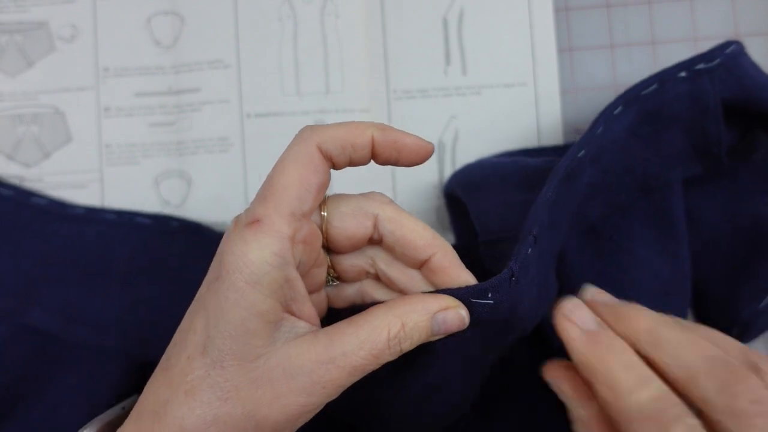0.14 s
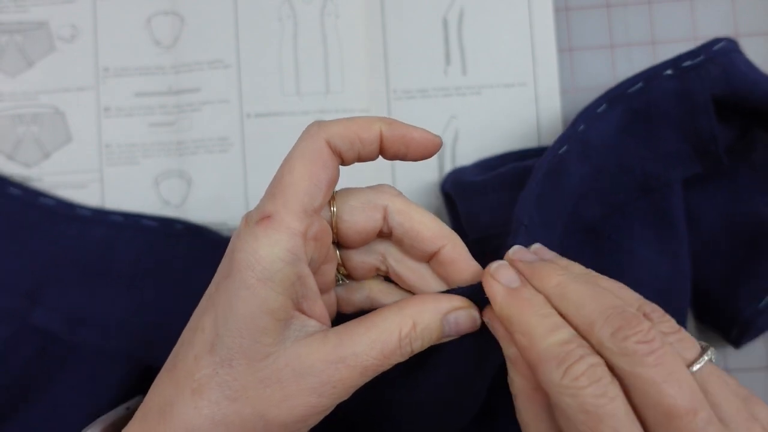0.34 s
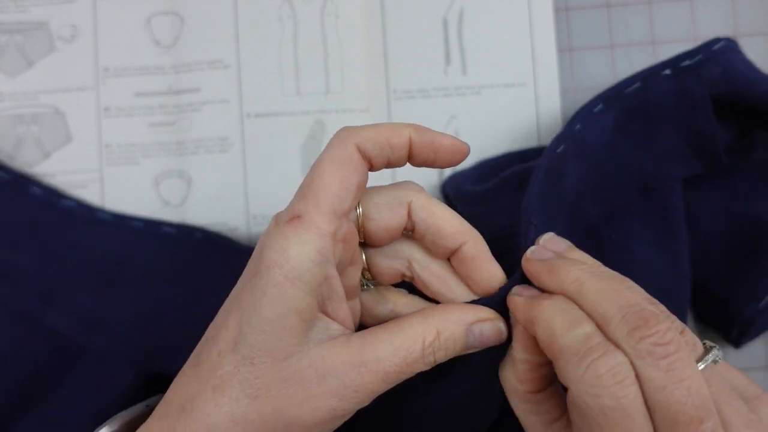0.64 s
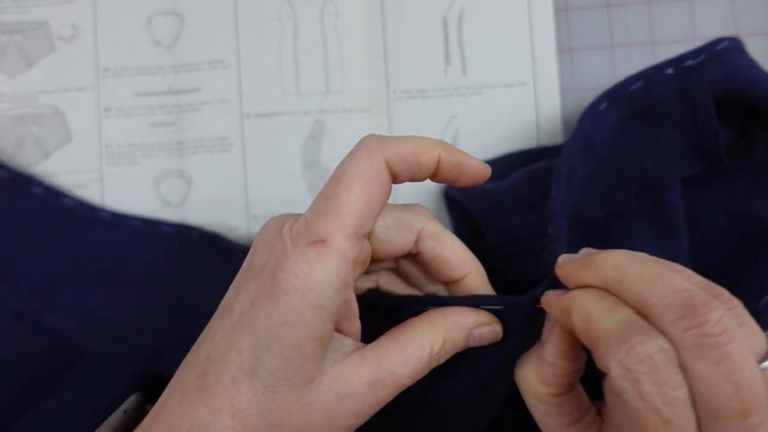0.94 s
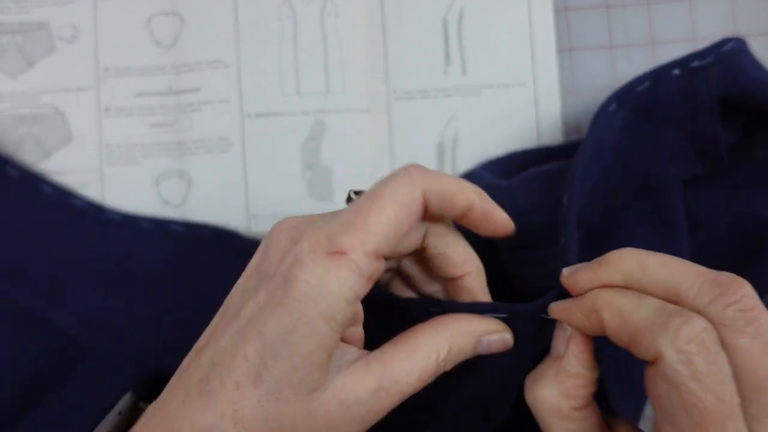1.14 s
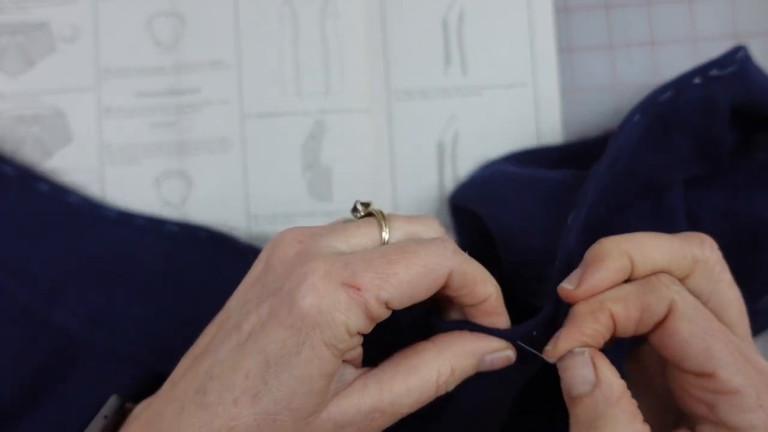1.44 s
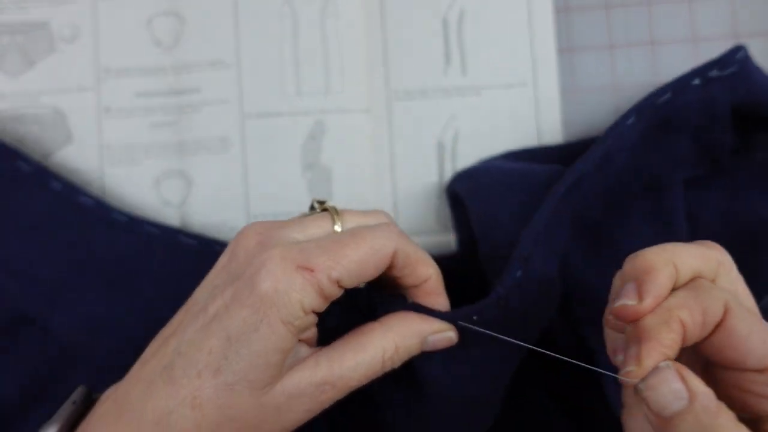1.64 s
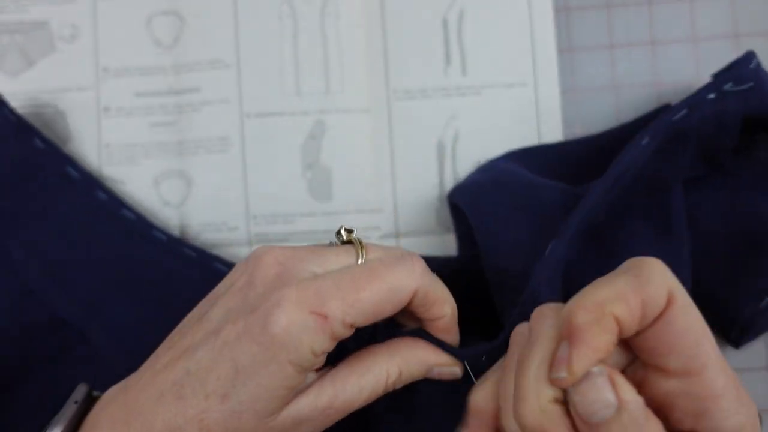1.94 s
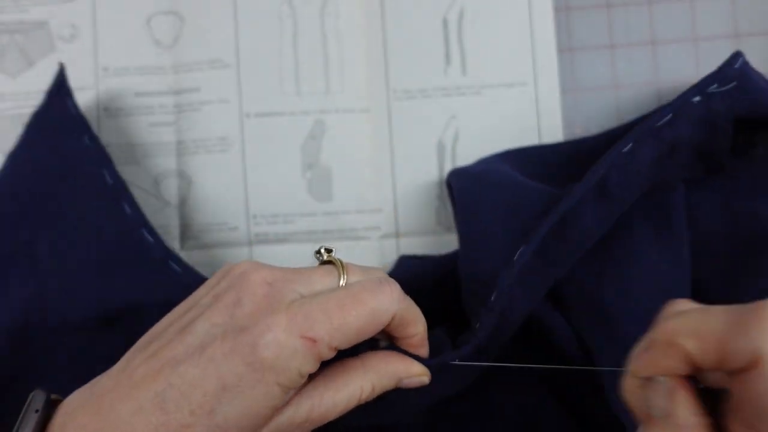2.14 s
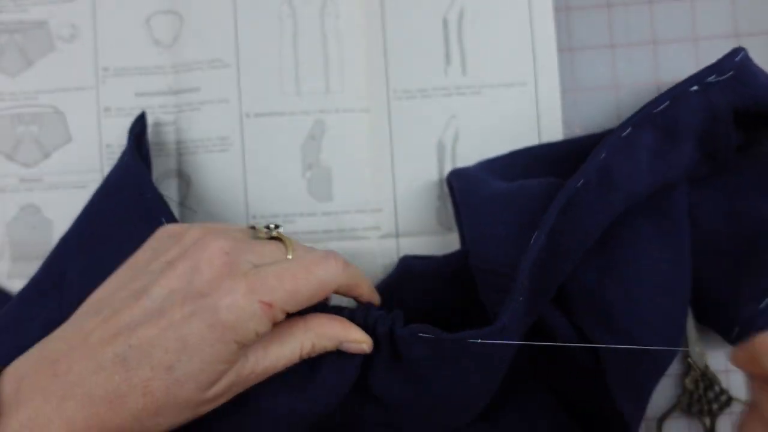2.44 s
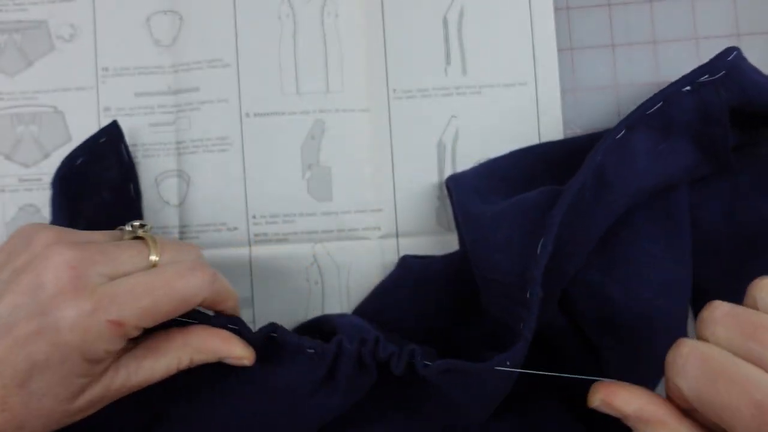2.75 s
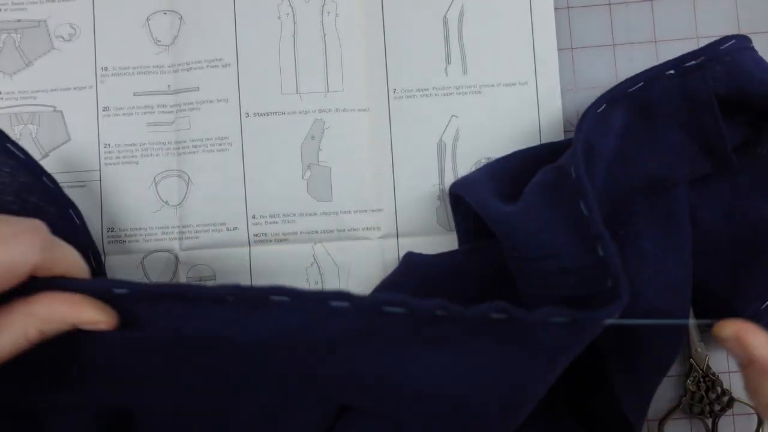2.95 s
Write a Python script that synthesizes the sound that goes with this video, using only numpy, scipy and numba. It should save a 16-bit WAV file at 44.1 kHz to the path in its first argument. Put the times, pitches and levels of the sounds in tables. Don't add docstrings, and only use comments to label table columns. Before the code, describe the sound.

Basting thread being drawn from linen: scissors clack down and rattle, fingers brush fabric, then bright zipping rasps come and go among dull thumps and tiny pops, close up in a quiet indoor room.

```python
import sys
import numpy as np
from scipy import signal
from scipy.fft import rfft, irfft
from scipy.io import wavfile
from scipy.ndimage import uniform_filter1d
from numba import njit

SR = 44100
rng = np.random.default_rng(int(sys.argv[2]) if len(sys.argv) > 2 else 0)


def field_ratio(decibels):
    return 10 ** (np.asarray(decibels, dtype=float) / 20)


def int16_out(signal):
    q = np.round(np.clip(np.atleast_2d(signal).T, -1, 1) * 32767)
    wavfile.write(sys.argv[1], SR, q.astype(np.int16))


N = 136710
T = np.arange(N) / SR


@njit
def svf(x, hz, width):
    y = np.empty(len(x))
    band, low = 0.0, 0.0
    for i in range(len(x)):
        g = np.tan(np.pi * hz[i] / SR)
        damping = width / hz[i]
        v = (band + g * (x[i] - low)) / (1 + g * (g + damping))
        band = 2 * v - band
        low = low + 2 * g * v
        y[i] = damping * v
    return y


def unit(x):
    return x / np.sqrt(np.mean(x ** 2))


def colour(x, points):
    p = np.array(points, float)
    hz = np.maximum(np.fft.rfftfreq(N, 1 / SR), 1)
    gain_db = np.interp(np.log(hz), np.log(p[:, 0]), p[:, 1])
    return irfft(rfft(x) * field_ratio(gain_db), N)


def walk(rate):
    k = int(SR / rate)
    held = np.repeat(rng.standard_normal(N // 20), k)[:N]
    return unit(uniform_filter1d(uniform_filter1d(held, k), k))


def fibres(spread_db, flutter_hz, flutter_db):
    scatter_db = spread_db * np.minimum(rng.exponential(size=N), 4)
    size = field_ratio(scatter_db + flutter_db * walk(flutter_hz))
    return size * rng.standard_normal(N)


def strokes(rows):
    power = 0
    for start, rise, hold, fall, db in rows:
        corners = np.cumsum([start, max(rise, 1e-3), max(hold, 1e-3), max(fall, 1e-3)])
        shape = np.interp(T, corners, [0, 1, 1, 0])
        power = power + (field_ratio(db) * np.sin(shape * np.pi / 2) ** 2) ** 2
    return np.sqrt(power)


def add(out, s, hz, t60, gain):
    i = max(int(s * SR) + 1, 0)
    t = T[i:i + int(1.5 * t60 * SR) + 2] - s
    out[i:i + len(t)] += gain * np.sin(2 * np.pi * hz * t) * np.exp(-np.log(1000) * t / t60)


def patchy(x, db):
    low = signal.sosfiltfilt(signal.butter(2, 6800, "low", fs=SR, output="sos"), x)
    high = signal.sosfiltfilt(signal.butter(2, 10500, "high", fs=SR, output="sos"), x)
    return sum(part * field_ratio(db * walk(16)) for part in (low, x - low - high, high))


def room():
    # hz, level_db
    air_spectrum, air_db = [(12, -56), (20, 2), (247, -2), (539, -3), (1110, -11.5), (1280, -8.5),
                            (2650, -15), (4200, -17.5), (6300, -15), (9500, -14), (13000, -21.5),
                            (15800, -20.5)], -44.5
    # hz, level_db (rms)
    whine = [(864, -58.5)]
    # hz, level_db (rms)
    fan = [(1637.4, -67), (2024.9, -67), (2111.9, -67), (4140, -71), (4610, -69)]
    # multiple, level_db (rms)
    buzz, buzz_hz = [(1, -58), (2, -72), (3, -69), (4, -67), (5, -67), (7, -68), (8, -67), (9, -71),
                     (10, -70), (11, -74)], 1249.8
    drift_db = 0.6 * walk(6)
    out = field_ratio(air_db + drift_db) * unit(colour(rng.standard_normal(N), air_spectrum))
    for hz, db in whine:
        out = out + field_ratio(db) * unit(svf(rng.standard_normal(N), np.full(N, 1.0 * hz), 14.0))
    for hz, db in [(k * buzz_hz, db) for k, db in buzz] + fan:
        tone = np.sin(2 * np.pi * (hz * T + rng.random()))
        out = out + np.sqrt(2) * field_ratio(db + 2 * drift_db) * tone
    return out


def scissors():
    # start_s, level_db
    bounces = [(.0, -23), (.005, -17.5), (0.017, -23.5), (.019, -18.5), (.027, -28.5), (.036, -26),
               (0.042, -26), (0.048, -37), (0.053, -26), (0.066, -32), (0.084, -32), (.1, -38)]
    # pitch_hz, level_db, t60_s
    modes = [(507, -24, 0.056), (890, -11, 0.04), (1076, -7, 0.14), (1230, -2.5, 0.026),
             (1450, -8.5, 0.051), (1834, -5, 0.03), (2086, -8, 0.026), (2390, -8, 0.038),
             (2750, -4.5, 0.016), (4500, -37, 0.013), (6200, -17, 0.011)]
    # start_s, rise_s, hold_s, fall_s, level_db
    blade = [
        (-.02, .02, 0.049, .09, -30.5),
    ]
    rattle_db, rattle_t60_s, rattle_hz = -31.5, 0.32, 1510.0
    chance = rng.standard_normal((len(bounces), len(modes), 2))
    rattle = unit(svf(fibres(3, 173, 3), np.full(N, rattle_hz), 1000.0))
    out = field_ratio(rattle_db) * np.exp(-np.log(1000) * T / rattle_t60_s) * rattle
    out = out + strokes(blade) * unit(svf(fibres(1.8, 60, 1.9), np.full(N, 1080.0), 70.0))
    for (s, db), row in zip(bounces, chance):
        for (hz, mode_db, t60), (a, b) in zip(modes, row):
            add(out, s, hz * (1 + 0.018 * a), t60, np.sign(a) * field_ratio(db + mode_db + 2.1 * b))
    return out


def table():
    # start_s, rise_s, hold_s, fall_s, level_db
    drags = [(-.02, 0.017, 0.03, 0.11, -32.5), (.09, 0.015, 0.11, 0.41, -37.5),
             (.37, 0.031, 0.085, 0.19, -41), (.55, 0.095, 0.03, 0.06, -43),
             (.66, 0.044, 0.095, 0.086, -42.5), (1.5, 0.0098, 0.082, 0.31, -46),
             (1.69, 0.024, 0.073, 0.078, -42.5), (1.8, 0.012, 0.11, 0.029, -46),
             (1.95, 0.014, 0.085, 0.15, -36), (2.1, 0.065, 0.16, 0.21, -40.5),
             (2.28, 0.017, 0.044, 0.077, -45.5), (2.42, 0.019, 0.28, 0.051, -45.5),
             (2.83, 0.024, 0.045, 0.25, -39), (3.04, 0.032, .05, 0.066, -40.5)]
    # hz, level_db
    drag_spectrum = [(35, -54), (60, -8.5), (240, -5), (375, -3.5), (533, -2.5), (878, -9.5), (1100, -14),
                     (1810, -18), (5000, -32.5), (6500, -49), (11000, -120)]
    # start_s, rise_s, hold_s, fall_s, level_db
    paper = [
        (.08, 0.05, .15, .2, -44.5),
        (.4, 0.054, 0.1, .15, -52),
        (1.95, 0.0092, .04, .05, -49),
    ]
    # start_s, peak_db, pitch_hz
    knocks, knock_t60_s = [(0.0173, -21, 1110), (.082, -31, 1120), (0.392, -32, 270), (.733, -29.5, 460),
                           (1.72, -29.5, 527), (1.88, -35, 1290), (1.967, -32, 543), (2.224, -26, 380),
                           (2.644, -25, 480), (2.643, -32.5, 151), (2.648, -34, 1380), (2.779, -35, 378)], 0.037
    # start_s, peak_db, pitch_hz
    thumps, thump_cycles = [(0.04, -32, 104), (0.178, -41, 70), (0.651, -39.5, 61.5), (0.901, -43, 40),
                            (1.187, -34, 76.4), (1.631, -34, 28.2), (1.995, -32, 106), (2.042, -29, 66.5),
                            (2.111, -25.5, 93), (2.309, -34.5, 81), (2.428, -38, 61), (2.539, -35, 73.6),
                            (2.648, -39, 55), (2.785, -36, 54.5)], 1.48
    drag = unit(colour(fibres(3.54, 90, 1.1), drag_spectrum))
    out = strokes(drags) * field_ratio(0.32 * walk(29.93)) * drag
    out = out + field_ratio(-4.5) * svf(out, np.full(N, 535.0), 30.0)
    paper_hz = 930 * (1 + 0.052 * walk(11.1))
    out = out + strokes(paper) * unit(svf(fibres(4.7, 80, 1.2), paper_hz, 200.0))
    for s, db, hz in knocks:
        add(out, s, hz, knock_t60_s, field_ratio(db))
        add(out, s, 1.24 * hz, knock_t60_s * 1.4, 0.49 * field_ratio(db))
    for s, db, hz in thumps:
        u = np.clip((T - s) * hz / thump_cycles, 0, 1)
        out = out + field_ratio(db) * np.sin(np.pi * u) ** 2 * np.sin(2 * np.pi * hz * (T - s))
    return out


def fingers():
    # start_s, rise_s, hold_s, fall_s, level_db
    rubs = [(.02, 0.036, 0.18, .1, -49.5), (.42, 0.067, 0.15, 0.027, -50.5), (.69, 0.023, 0.1, .04, -52.5),
            (.79, 0.028, 0.056, 0.061, -46), (.84, 0.13, 0.077, .03, -48), (1.12, 0.04, 0.037, 0.049, -40),
            (1.16, 0.035, 0.015, 0.013, -36.5), (1.22, 0.0076, 0.029, 0.079, -43.5),
            (1.78, 0.027, 0.025, 0.079, -37.5), (1.84, 0.026, 0.15, 0.056, -43),
            (2.33, 0.011, 0.016, 0.031, -36), (2.34, 0.046, 0.64, 0.04, -43),
            (2.565, 0.012, 0.033, 0.039, -42.5), (2.644, 0.00091, 0.003, 0.0034, -32),
            (2.725, 0.0036, 0.0081, 0.026, -38), (2.775, 0.0038, 0.019, 0.06, -44)]
    # hz, level_db
    rub_spectrum = [(1500, -19), (4800, -20), (5900, -12), (7500, -7), (9400, 0), (10800, -9), (13800, -17),
                    (15800, -22)]
    # start_s, rise_s, hold_s, fall_s, level_db
    scuff = [
        (.05, 0.1, 0.085, 0.18, -47),
    ]
    # start_s, peak_db, pitch_hz
    ticks = [
        (.0965, -33, 9300),
        (1.8795, -32, 9000),
        (2.4097, -18, 8300),
        (2.588, -19, 8500),
        (.898, -33, 9000),
        (2.648, -25, 8000),
    ]
    # ratio, level_db
    partners = [(0.68, -19), (1.2, -2), (1.5, -13), (0.38, -14)]
    out = strokes(rubs) * unit(patchy(colour(fibres(0.79, 250, 0.65), rub_spectrum), 0.71))
    out = out + strokes(scuff) * unit(svf(fibres(6.0, 75.5, 1.0), np.full(N, 4500.0), 4800.0))
    for s, db, hz in ticks:
        for ratio, side_db in [(0.96, 0)] + partners:
            add(out, s, ratio * hz, 0.0055, field_ratio(db + side_db))
    return out


def thread():
    # start_s, rise_s, hold_s, fall_s, level_db
    pulls = [
        (.86, 0.12, 0.062, .04, -39.5),
        (2.53, 0.016, 0.012, .02, -36),
        (1.39, 0.084, 0.022, .04, -39.5),
        (1.45, 0.1, 0.07, 0.18, -31.5),
        (1.64, 0.03, 0.046, 0.022, -38),
        (1.72, 0.018, 0.042, 0.027, -45.5),
        (1.99, 0.059, 0.058, 0.063, -25.5),
        (2.1, 0.05, 0.064, 0.19, -25.5),
        (2.79, 0.061, 0.041, 0.065, -30.5),
        (2.86, 0.082, 0.13, 0.073, -29.5),
    ]
    # hz, level_db
    hiss_spectrum = [(2500, -17.5), (4900, -19), (5500, -11), (7000, -3.5), (9800, 0), (10900, -6),
                     (13800, -10), (15800, -17)]
    # time_s, centre_hz
    centre = [(1.0, 8400), (1.45, 5970), (1.52, 7100), (1.62, 9200), (1.72, 8500), (1.98, 7960),
              (2.15, 8040), (2.3, 7800), (2.37, 8800), (2.84, 9200), (2.93, 9800), (3.1, 8800)]
    # start_s, rise_s, hold_s, fall_s, level_db
    taut_strokes = [
        (1.5, 0.018, 0.075, 0.25, -46),
        (1.96, 0.067, 0.12, 0.058, -44),
        (2.11, 0.03, 0.048, 0.05, -39.5),
        (2.2, 0.025, 0.097, 0.049, -37),
        (2.36, 0.035, 0.366, 0.075, -49.5),
        (2.53, .01, 0.037, 0.027, -44),
        (2.82, 0.011, 0.16, 0.12, -50),
    ]
    # start_s, rise_s, hold_s, fall_s, level_db
    rasp_strokes = [
        (1.5, 0.039, 0.068, 0.055, -47),
        (1.63, 0.042, 0.055, .02, -46.5),
        (1.83, .03, .03, .03, -50.5),
        (1.95, .015, .03, .03, -50),
        (2.0, 0.063, .1, .05, -42),
        (2.13, .04, .12, .06, -41),
        (2.36, .03, 0.38, .06, -53.5),
        (2.83, 0.058, 0.16, .08, -53),
    ]
    # start_s, rise_s, hold_s, fall_s, level_db
    hole_strokes = [(.05, .05, .25, .3, -59), (.88, .06, .08, .04, -55), (1.39, 0.15, .07, 0.086, -38.5),
                    (1.62, 0.048, 0.052, .015, -41), (1.8, 0.018, 0.091, .05, -51.5),
                    (1.99, .03, 0.074, 0.054, -37), (2.1, 0.034, 0.15, .08, -38),
                    (2.36, .03, 0.11, .03, -52), (2.53, 0.013, .06, 0.055, -44.5),
                    (2.66, 0.022, 0.078, .03, -45), (2.75, .02, 0.073, .03, -48.5),
                    (2.83, 0.059, 0.19, .06, -42.5)]
    centre_hz = np.interp(T, *np.transpose(centre))
    hiss = unit(patchy(colour(fibres(2.6, 300, 0.86), hiss_spectrum), 1.0))
    hiss = unit(hiss + field_ratio(-10) * svf(hiss, centre_hz, 2600.0))
    air = signal.sosfiltfilt(signal.butter(2, 10300, "high", fs=SR, output="sos"), hiss)
    speed = strokes(pulls)
    air_gain = (speed / speed.max()) ** 0.53 * (centre_hz / 8600) ** 3.7
    taut_hz = 2260 * (1 + 0.022 * walk(9.25))
    taut = unit(svf(fibres(1.7, 60.4, 0.6), taut_hz, 610.0))
    rasp = unit(svf(fibres(2.1, 70, 0.93), np.full(N, 4100.0), 1700.0))
    hole_hz, hole_width_hz = 5930 * (1 + 0.031 * walk(8.27)), 1860.0
    whistle = svf(fibres(2.7, 200, 1.6), hole_hz, hole_width_hz)
    whistle = unit(svf(whistle, hole_hz, hole_width_hz))
    out = speed * (hiss - air + air * air_gain)
    out = out + strokes(taut_strokes) * taut
    out = out + strokes(rasp_strokes) * rasp
    return out + strokes(hole_strokes) * whistle


def scene():
    # hz, level_db
    ports, ports_db = [(18, -31), (30, -1), (301, -0.5), (496, -0.5), (645, 0.5), (883, -8), (2460, -4.5),
                       (15800, -13)], -59
    low = table()
    mid = room() + scissors() + low + fingers() + thread()
    side = field_ratio(ports_db) * unit(colour(rng.standard_normal(N), ports))
    side = side + field_ratio(-56.0) * low * walk(60)
    return np.array([mid + side, mid - side])


def roll_off(x):
    return signal.sosfilt(signal.butter(12, 15790, fs=SR, output="sos"), x)


def record(dry):
    ceiling = 0.3
    soft = ceiling * np.tanh(dry / ceiling)
    top_cut = signal.ellip(10, 0.2, 80, 15790, fs=SR, output="sos")
    mix = signal.sosfilt(top_cut, soft)
    return roll_off(mix)


dry = scene()
out = record(dry)
int16_out(out)
```